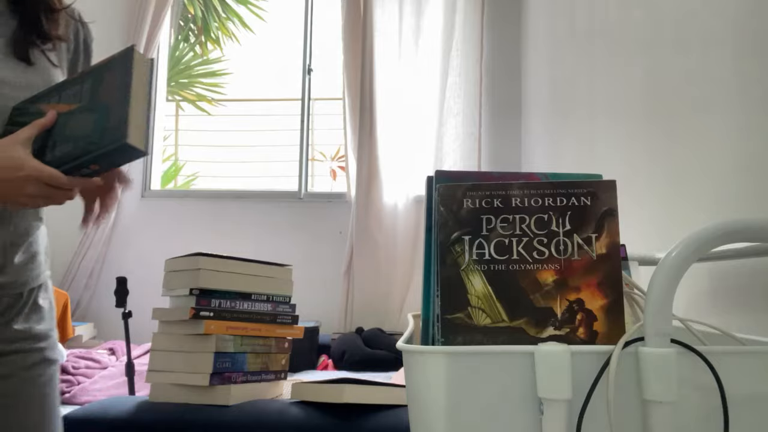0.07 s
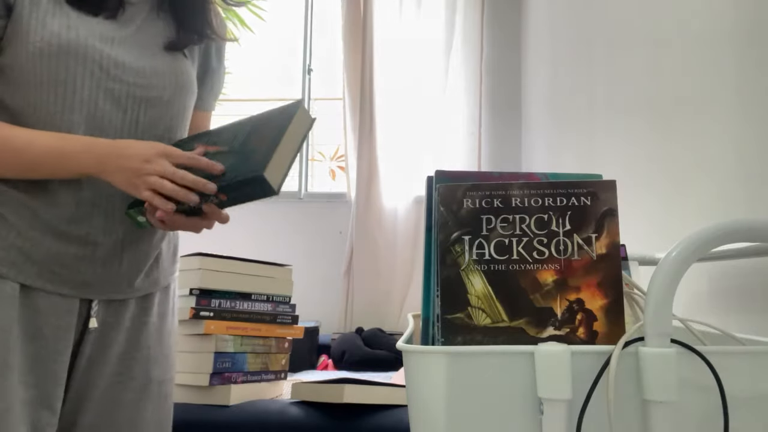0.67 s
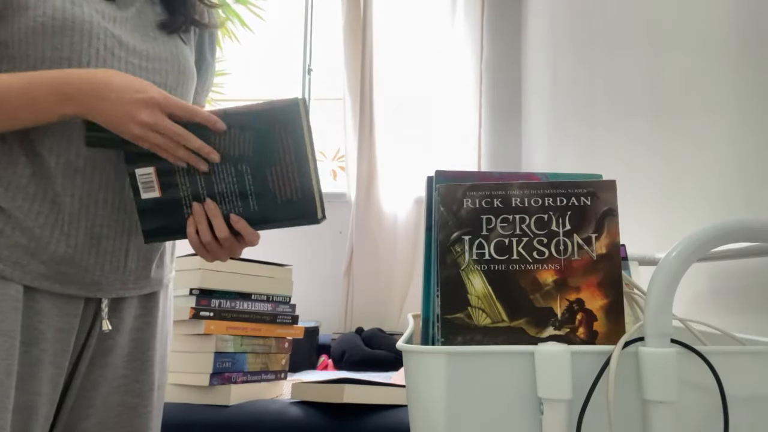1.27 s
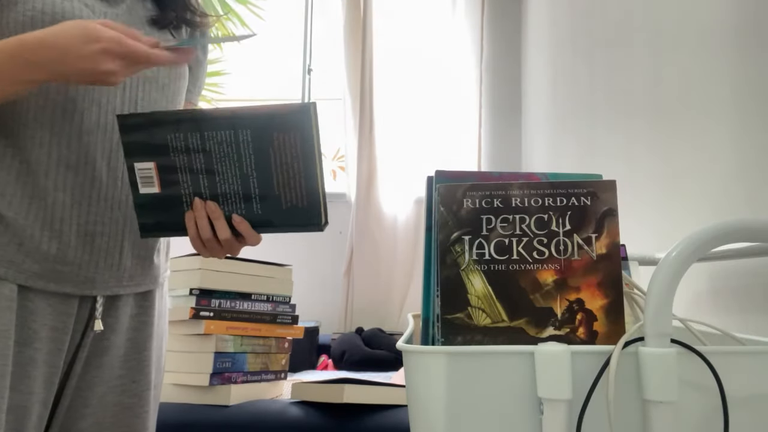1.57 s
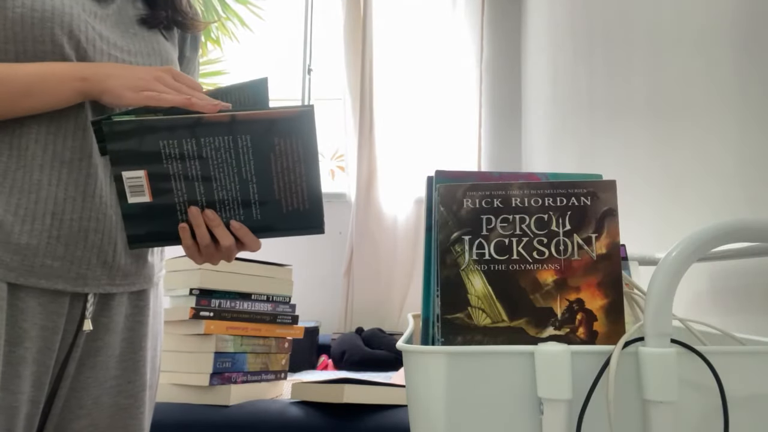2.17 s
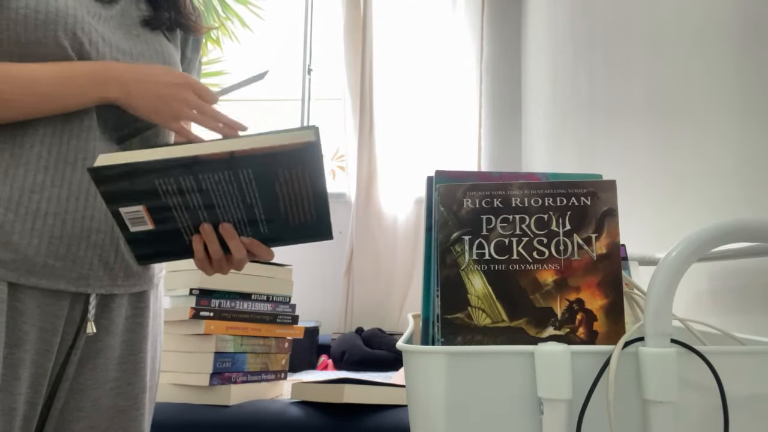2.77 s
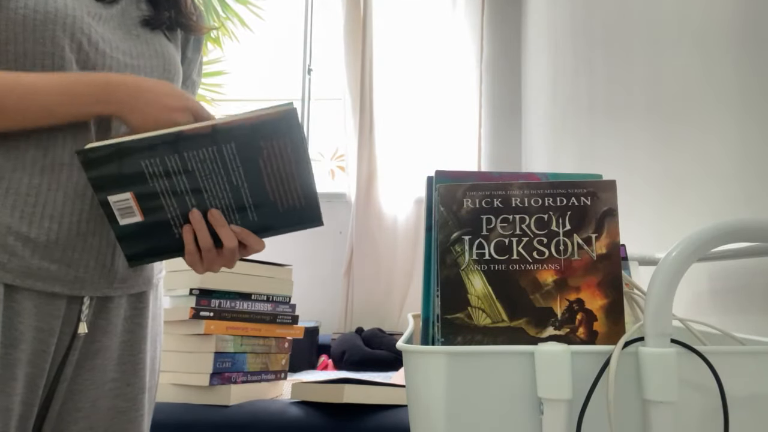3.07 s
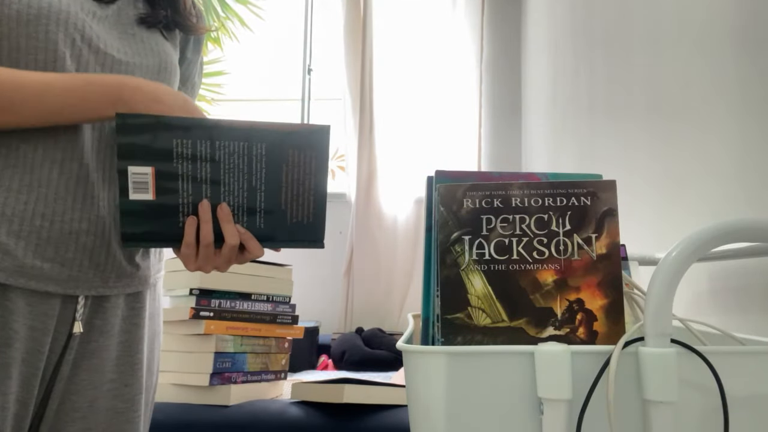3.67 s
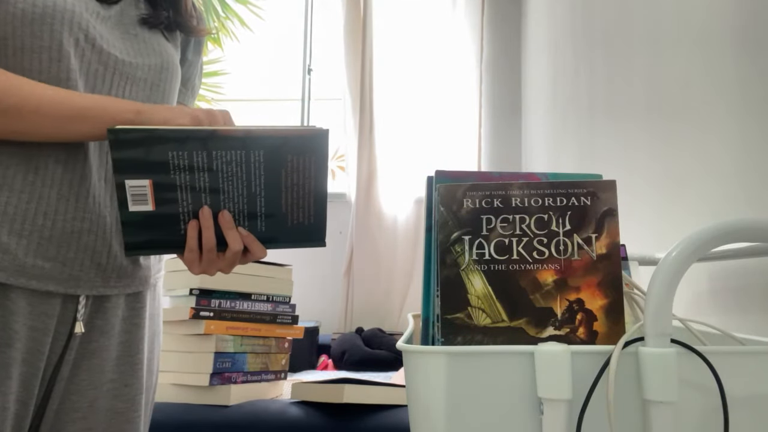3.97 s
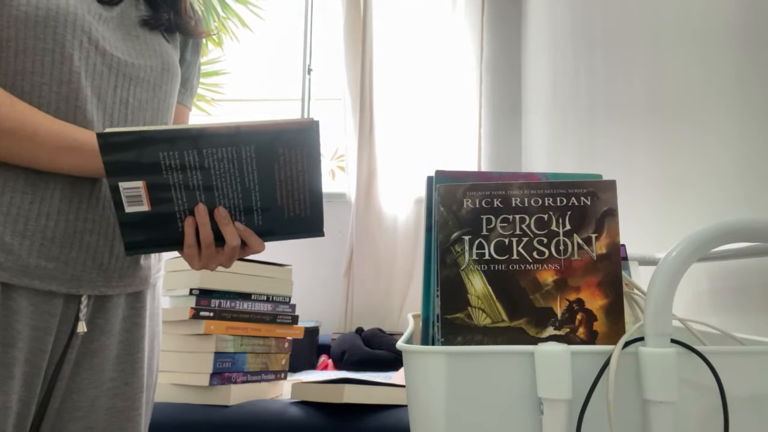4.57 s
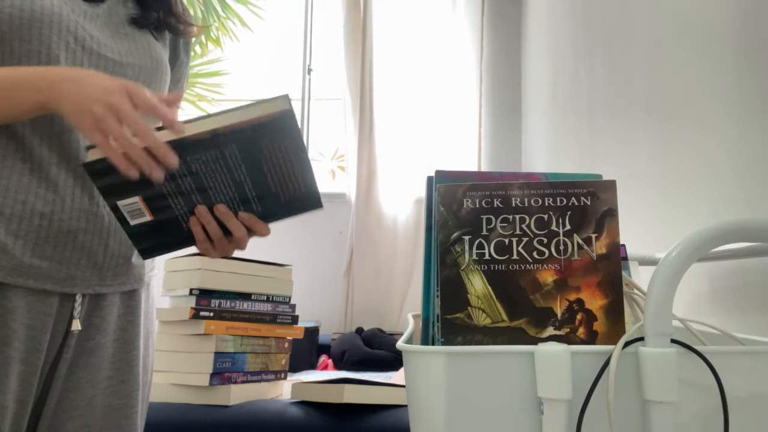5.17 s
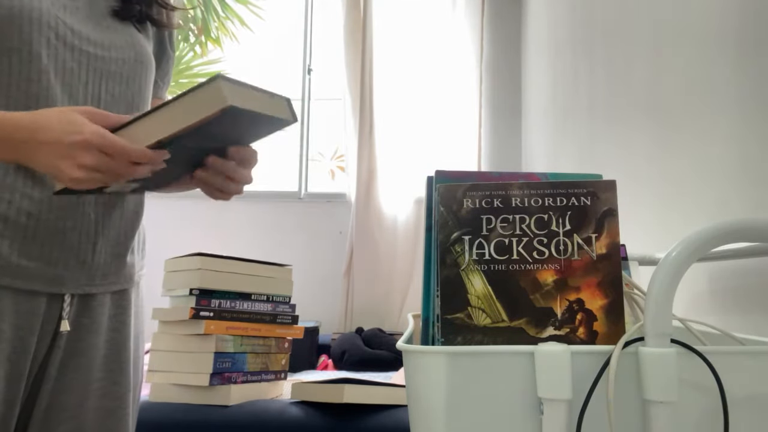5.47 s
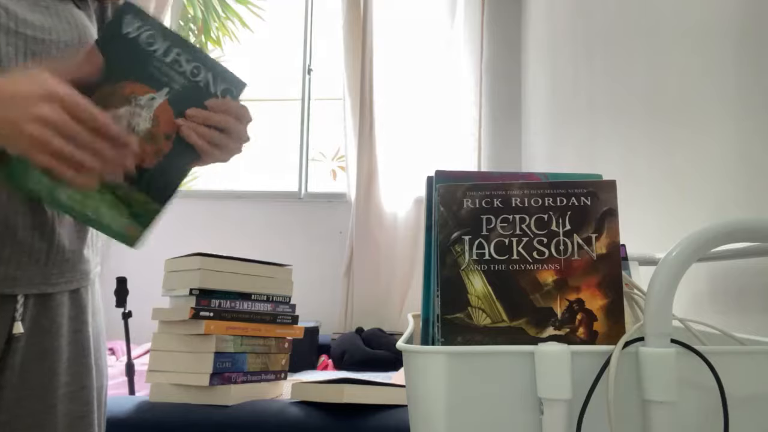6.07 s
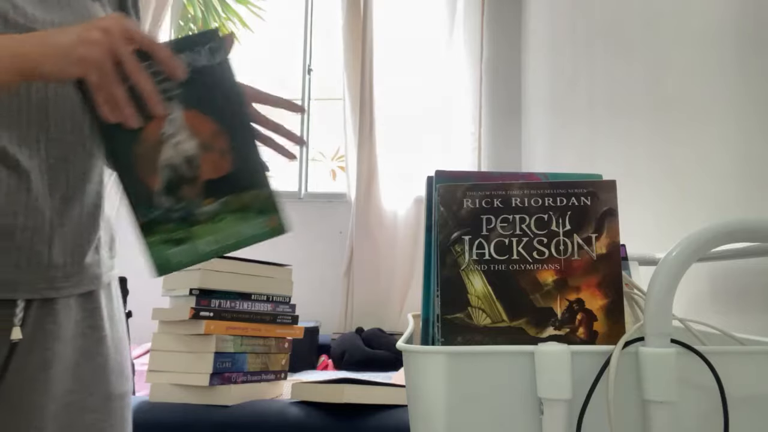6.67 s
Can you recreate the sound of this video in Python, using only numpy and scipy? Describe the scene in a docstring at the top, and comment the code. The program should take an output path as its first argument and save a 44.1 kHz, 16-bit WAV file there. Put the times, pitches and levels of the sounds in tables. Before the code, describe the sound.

Close stereo microphones pick up hands handling a hardcover book over the low hum of a small room. Palms thump and rub it, and the cover claps loudly once. After a brief finger judder come several knocks, then soft swishes and faint squeaks on the glossy jacket. Crisp page ticks and one more firm thump give way to gentle brushing and taps.

```python
"""A hardcover book is turned over in the hands in a small, quiet room with a low hum.
Palms rub the board and thump the block of pages; the cover claps, loudest at 1.7 s. A finger judders
across the board, then a run of knocks follows. Around 4 s fingertips swish and squeak on the glossy
jacket. Page edges tick, one more firm thump lands at 5.3 s, and the handling ends in light brushes
and taps. Two closely spaced microphones stand nearby."""
import sys
import numpy as np
from scipy import signal
from scipy.fft import rfft, irfft, next_fast_len
from scipy.io import wavfile
from scipy.ndimage import uniform_filter1d, map_coordinates

SR = 44100
rng = np.random.default_rng(int(sys.argv[2]) if len(sys.argv) > 2 else 0)


def wav_out(sig):
    """Save sig, one row per channel (or a flat mono array), as 16-bit PCM at SR to the path in sys.argv[1]."""
    wavfile.write(sys.argv[1], SR, np.round(np.clip(np.atleast_2d(sig).T, -1, 1) * 32767).astype(np.int16))


N = 300497


def amp(db):
    """Decibels to gain."""
    return 10 ** (np.asarray(db) / 20)


def unit(x):
    """Scale to rms 1."""
    return x / np.sqrt(np.mean(x ** 2) + 1e-20)


def along(points, hz):
    """Read (Hz, value) points on a log frequency axis."""
    freqs, values = np.transpose(points)
    return np.interp(np.log(hz + 1), np.log(freqs + 1), values)


def curves(rows):
    """One value per sample for each column after the time."""
    times, *columns = np.transpose(rows)
    return [np.interp(np.arange(N) / SR, times, column) for column in columns]


def wobble(rate):
    """A smooth random curve with rate knots a second."""
    knots = rng.standard_normal(int(N * rate / SR) + 4)
    return map_coordinates(knots, [np.arange(N) * rate / SR], order=3)


def filtered(x, response):
    """Pass x through a complex response, given as a function of Hz."""
    n = x.shape[-1]
    padded = next_fast_len(n + 8192)
    return irfft(rfft(x, padded) * response(np.fft.rfftfreq(padded, 1 / SR)), padded)[..., :n]


def coloured(x, spectrum):
    """Shape x with an EQ curve of (Hz, dB) points, at rms 1."""
    return unit(filtered(x, lambda hz: amp(along(spectrum, hz))))


def resonance(hz, centre, width):
    """Causal response of one mode."""
    return 1j * hz * width / (centre ** 2 - hz ** 2 + 1j * hz * width)


def add(track, start, sound):
    """Mix a sound into the track at start seconds."""
    part = track[..., max(round(start * SR), 0):][..., :sound.shape[-1]]
    part += sound[..., :part.shape[-1]]


# Stereo width of the room. Each row: frequency in Hz, left-right correlation.
CORRELATION = [(60, 0.82), (130, 1), (290, 0.47), (640, 0.033), (1500, 0.017), (15000, .02)]

def diffuse(size):
    """Stereo noise from all sides: alike in the bass, unrelated in the treble."""
    def mid_side(hz):
        angle = np.arccos(np.clip(along(CORRELATION, hz), -1, 1)) / 2
        return np.array([np.cos(angle), np.sin(angle)])
    mid, side = filtered(rng.standard_normal((2, size)), mid_side)
    return np.array([mid + side, mid - side])


# Phase between the microphones. Each row: frequency in Hz, lead of the left one in radians.
LEFT_LEAD = [(0, 0), (340, 0), (800, .9), (4100, 1.5), (8000, 6.3), (11500, 11), (13000, 13.6),
             (16000, 14.6)]
# Reverb time of the walls. Each row: frequency in Hz, seconds to fall 60 dB.
WALL_DECAY = [(100, 0.65), (260, 0.55), (700, 0.41), (2000, 0.31), (5000, 0.3), (14000, 0.21)]

def in_room(x, wet_db, right_db):
    """Direct sound arrives first on the left, its mids lean right; the walls answer just after."""
    sides = np.array([[.5], [-.5]])
    lean_db = lambda hz: right_db * along([(50, -0.36), (250, 1.0), (4500, 1), (7000, 0.28)], hz)
    direct = filtered(x, lambda hz: np.exp(1j * along(LEFT_LEAD, hz) * sides) * amp(-lean_db(hz) * sides))
    bands, t, noise = signal.stft(diffuse(size=SR // 2), SR, nperseg=256)
    decay = amp(-60 * t / along(WALL_DECAY, bands)[:, None])
    onset = 1 - np.exp(-t / 0.00063)
    _, tail = signal.istft(noise * decay * onset, SR, nperseg=256)
    curtains = lambda hz: amp(along([(4000, 0.73), (13000, 0.025)], hz))  # soak up a little treble
    tail = filtered(tail / np.linalg.norm(tail[0]), curtains)
    return direct + amp(wet_db) * signal.fftconvolve(x[None], tail, axes=1)[:, :len(x)]


# Fader ride of the hum. Each row: time in seconds, relative level in dB.
HUM_RIDE = [(0.0, -45), (0.04, -51.5), (1.15, -56.5), (1.4, -68), (1.48, -53.5), (1.78, -51), (1.84, -66),
            (1.95, -47), (2.31, -59), (2.45, -51), (3.32, -59), (3.68, -73), (5.01, -66.5), (5.37, -49),
            (5.44, -55.5), (6.81, -56.5)]
# EQ of the still air. Each row: frequency in Hz, gain in dB.
AIR_EQ = [(20, -11.5), (45, -2.5), (75, 4.5), (120, -12.5), (250, -6.5), (500, -12.5), (1000, -15),
          (2500, -20), (6000, -26), (13000, -24), (16000, -46.5)]

def room_tone():
    """A low hum swells and sinks over a bed of still air."""
    ride_db, = curves(HUM_RIDE)
    pitch_hz = 59.2 + 0.44 * wobble(5.4)
    hum = np.sqrt(2) * np.sin(2 * np.pi * np.cumsum(pitch_hz) / SR)
    hum *= amp(ride_db + 1.0 + 2.2 * wobble(12))
    air = amp(-71.5) * coloured(diffuse(size=N), AIR_EQ)
    return hum * amp([[.3], [-.3]]) + air


# Fader ride of the movement. Each row: time in seconds, relative level in dB.
HEAVE_RIDE = [(0.0, -54.5), (0.36, -57.5), (1.33, -59.5), (1.97, -49.5), (2.22, -61.5), (2.67, -59),
              (3.0, -64.5), (4.76, -79), (5.2, -70), (5.33, -68), (6.64, -59.5), (6.81, -60.5)]
# EQ of its rumble. Each row: frequency in Hz, gain in dB.
RUMBLE_EQ = [(25, -26.5), (55, -21), (68, 5), (78, 8), (92, 2), (125, -6), (160, -0.5), (230, -8),
             (320, -16.5), (500, -21.5), (1000, -47.5)]

def heave():
    """The moving book and arms make a dull rumble."""
    ride_db, = curves(HEAVE_RIDE)
    rumble = coloured(rng.standard_normal(N), RUMBLE_EQ)
    return in_room(amp(ride_db - 1.5) * rumble, wet_db=-1, right_db=9)


def stroke(start, length, peak):
    """Friction swells and fades with the hand's speed, which tops out at the share peak of the stroke."""
    progress = (np.arange(N) / SR - start) / length
    during = (progress > 0) & (progress < 1)
    ramp = np.interp(progress[during], [0, peak, 1], [0, 1, 0])
    gain = np.zeros(N)
    gain[during] = np.sin(np.pi / 2 * ramp) ** 1.41
    return gain


def friction(spectrum, catches_per_s, grain_db, uneven_db):
    """Countless tiny slips and a few larger catches under uneven pressure, mirrored by the moving cover."""
    catches = (rng.random(N) < catches_per_s / SR) * rng.standard_normal(N)
    slips = coloured(rng.standard_normal(N) + amp(grain_db) * unit(catches), spectrum)
    delay_s = 0.001186 * 2 ** (.5 * wobble(1.8))
    mirrored = np.interp(np.arange(N) - delay_s * SR, np.arange(N), slips)
    pressure = amp(uneven_db * wobble(70))
    return unit((slips + .5 * mirrored) * pressure)


# EQs of the board's rasp, the jacket's swish and the paper's hiss. Each row: frequency in Hz, gain in dB.
RASP_EQ = [(150, -19.5), (320, -2.5), (450, -2), (620, -1), (900, 1), (1400, -1.5), (2000, -6.5),
           (3000, -16.5), (6000, -54)]
SWISH_EQ = [(1000, -19), (2000, -3.5), (3000, 2), (4200, 0.5), (5500, -3), (8000, -10), (9500, -16.5),
            (13000, -39.5), (16000, -49)]
HISS_EQ = [(3000, -25), (5500, -10), (8000, -2), (9500, -3), (11500, 1), (13000, 3), (14500, 0),
           (15800, -16)]
# A palm rubbing the board. Each row: start in seconds, length in seconds, rasp send in dB,
# hiss send in dB against the rasp send.
PALM_RUBS = [(0.136, 0.2, -52, -12.5), (0.487, 0.11, -57.5, -14.5), (0.637, .2, -52, -12.5),
             (1.698, 0.24, -43, -24), (2.115, 0.11, -63.5, -24), (2.326, 0.16, -65, -58),
             (2.608, 0.22, -48.5, -16.5), (2.837, 0.22, -55, -27), (2.961, 0.17, -47.5, -9.5),
             (3.107, .1, -44, -47), (3.301, .15, -43.5, -17.5), (3.695, .16, -50, -26),
             (6.14, 0.35, -74, -8), (6.496, 0.21, -58, -23)]
# Light brushes along the paper. Each row: start in seconds, length in seconds, hiss send in dB.
PAPER_BRUSHES = [(0.245, 0.2, -64), (0.823, 0.29, -57), (1.141, 0.25, -57), (1.572, .12, -67.5),
                 (3.168, 0.15, -55), (3.833, 0.21, -60.5), (4.676, 0.32, -65), (4.836, 0.15, -59),
                 (5.263, .07, -68.5), (5.338, 0.22, -74), (5.808, 0.25, -67.5), (6.297, 0.11, -69),
                 (6.409, 0.18, -69.5)]
# Fingertips swiping the jacket. Each row: start in seconds, length in seconds, swish send in dB.
JACKET_SWIPES = [(1.05, 0.091, -61.5), (1.114, .16, -51.5), (1.336, 0.12, -56.5), (1.675, .05, -51),
                 (2.682, 0.049, -66), (3.754, 0.065, -66.5), (3.969, 0.098, -56), (4.059, .11, -56),
                 (4.252, 0.043, -66.5), (4.389, 0.09, -67.5), (4.509, 0.12, -61.5)]

def slides():
    """Hands rasp on the board, hiss along the paper and swish over the jacket; each touch blends all three."""
    touches = []  # an envelope and its sends to rasp, swish and hiss
    for start, length, db, hiss_db in PALM_RUBS:
        touches.append((stroke(start, length, peak=0.32), [db, db + hiss_db / 2, db + hiss_db]))
    for start, length, db in PAPER_BRUSHES:
        touches.append((stroke(start, length, peak=0.73), [db - 12.5, db - 11, db]))
    for start, length, db in JACKET_SWIPES:
        touches.append((stroke(start, length, peak=0.54), [db - 11.5, db, db - 1.5]))
    sends = sum(amp(sends_db)[:, None] * envelope for envelope, sends_db in touches)
    rasp, swish, hiss = uniform_filter1d(sends, size=SR // 60, axis=1)  # a hand never starts at once
    rasp *= amp(-6.0) * friction(RASP_EQ, catches_per_s=300, grain_db=-4, uneven_db=3.14)
    swish *= amp(-3.88) * friction(SWISH_EQ, catches_per_s=120, grain_db=-4.5, uneven_db=3.4)
    hiss *= friction(HISS_EQ, catches_per_s=220, grain_db=-3, uneven_db=1.2)
    return in_room(hiss, wet_db=-7, right_db=3) + in_room(rasp + swish, wet_db=-3, right_db=8)


# Modes of the cover board. Each row: frequency in Hz, width in Hz, gain in dB.
BOARD_MODES = [(514, 48, -1), (806, 170, 1), (970, 55, 3.5), (1123, 180, -3.5), (1423, 190, -2),
               (1850, 680, -6.5), (3310, 710, -2.5), (3900, 2700, -7.5), (8300, 3800, -8),
               (12900, 5800, -8.5)]
# Sharp hits of cover, jacket and fingertips. Each row: start in seconds, level in dB, top edge in Hz.
COVER_CLAPS = [(.176, -44.5, 900), (0.3323, -52, 1970), (1.0503, -34, 4700), (1.152, -38, 6360),
               (1.4494, -43, 6740), (1.72, -20, 7600), (1.7235, -31, 490), (1.7276, -30.5, 7500),
               (1.7458, -28, 3400), (2.1289, -49.5, 5650), (2.641, -44, 3030), (2.7065, -35, 3000),
               (2.79, -38.5, 3000), (2.8827, -38, 1530), (2.9727, -41.5, 4370), (3.1056, -28, 2530),
               (3.144, -38, 1980), (3.1547, -25.5, 1240), (3.2915, -23, 1050), (3.291, -29, 7740),
               (3.975, -46, 8700), (5.2771, -46.5, 1860), (5.7355, -62, 1270), (5.985, -51.5, 3500),
               (6.178, -61, 1820), (6.5257, -56, 6540)]

def claps():
    """A first contact and a short crush excite the board; harder hits are brighter and over sooner."""
    track, t = np.zeros((2, N)), np.arange(SR // 2) / SR
    board = lambda f: sum((-1) ** k * amp(db) * resonance(f, hz, width)
                          for k, (hz, width, db) in enumerate(BOARD_MODES))
    edge = lambda f, hz: resonance(f, hz, np.sqrt(2) * hz)
    for start, db, top_hz in COVER_CLAPS:
        hardness = top_hz / 2550  # 1 is a middling hit
        bottom_hz = 830 * hardness ** 0.35
        crush_s = 0.013 / hardness ** 0.35
        force = rng.standard_normal(len(t)) * amp(-40 * t / crush_s)
        force[0] = amp(14.0)  # the first contact
        clap = filtered(force, lambda f: board(f) * edge(f, bottom_hz) * edge(f, top_hz))
        add(track, start, in_room(amp(db) * clap / np.abs(clap).max(), wet_db=-0.5, right_db=7))
    return track


# Soft blows on the closed book. Each row: start in seconds, level in dB, pitch in Hz.
PALM_THUMPS = [(.178, -20.5, 261.2), (.248, -30.5, 242.7), (0.776, -51.5, 214), (1.054, -34, 302),
               (1.147, -45, 241), (1.473, -44, 189), (1.724, -33, 411), (1.744, -32.5, 241.7),
               (2.642, -47.5, 137), (3.156, -43, 290), (3.293, -41, 320), (5.282, -28.5, 214.5),
               (5.741, -53.5, 254), (5.99, -48.5, 277), (6.19, -46.5, 286)]
# Modes of the block of pages. Each row: multiple of the thump's pitch, gain in dB.
BLOCK_MODES = [(.62, -11), (.9, -7), (1, 0), (1.15, -11), (2.05, -29), (3.05, -30)]
# Standing waves between the walls. Each row: frequency in Hz, width in Hz, relative gain in dB.
ROOM_MODES = [(153, 15.3, -1), (232.6, 8.5, 1.5), (286.4, 5.4, -4)]

def thumps():
    """A palm sets the heavy block of pages ringing, low and briefly; the room's standing waves boom on."""
    track, t = np.zeros(N), np.arange(SR * 3 // 4) / SR
    attack = 1 - np.exp(-t / 0.0071)
    for start, db, hz in PALM_THUMPS:
        t60 = 32.3 / hz  # the block falls 60 dB in 32.3 swings
        ring = sum(amp(mode_db + rng.normal(0, 1)) * np.sin(2 * np.pi * ratio * hz * t)
                   for ratio, mode_db in BLOCK_MODES)
        add(track, start, amp(db - 60 * t / t60) * attack * ring)
    room = lambda f: sum(amp(db) * resonance(f, hz, width) for hz, width, db in ROOM_MODES)
    boom = amp(0.5) * filtered(track, room)
    return in_room(track + boom, wet_db=-7, right_db=5.5)


# Page edges flicking past a fingertip. Each row: start in seconds, level in dB.
PAGE_TICKS = [(1.05, -34), (1.4486, -31), (3.263, -32.5), (3.2723, -27), (4.9247, -38), (4.9324, -24),
              (4.9404, -38), (5.1577, -44), (5.277, -49), (5.9835, -38)]

def ticks():
    """Each page edge lets go with one tiny, bright snap."""
    track = np.zeros(N)
    snap = filtered(signal.unit_impulse(200), lambda hz: resonance(hz, centre=12500, width=6000) ** 2)
    for start, db in PAGE_TICKS:
        add(track, start, amp(db) * snap / np.abs(snap).max())
    return in_room(track, wet_db=-9, right_db=0)


# Faint squeaks on the jacket. Each row: start in seconds, length in seconds, pitch in Hz,
# glide in octaves, level in dB.
SKIN_SQUEAKS = [(1.326, 0.1, 3150, .1, -66), (3.485, 0.15, 4560, 0.16, -68.5),
                (3.965, 0.085, 2830, 0.018, -57.5), (4.237, 0.058, 3024, 0.045, -68),
                (4.509, 0.1, 2607, 0.0022, -65.5), (6.049, 0.14, 3300, -.4, -80),
                (6.45, 0.16, 4700, -0.12, -68)]

def squeaks():
    """Skin catching on the gloss sings in a narrow, unsteady band."""
    track = np.zeros(N)
    for start, length, hz, glide, db in SKIN_SQUEAKS:
        progress = np.linspace(0, 1, int(length * SR))
        jitter = unit(uniform_filter1d(rng.standard_normal(len(progress)), size=30))
        pitch_hz = hz * 2 ** (glide * (progress - .5)) * (1 + 0.0665 * jitter)
        tone = np.sin(2 * np.pi * np.cumsum(pitch_hz) / SR)
        add(track, start, amp(db) * np.sin(np.pi * progress) * tone)
    return in_room(track, wet_db=-2, right_db=7)


# A finger sticking and slipping. Each row: time in seconds, slips per second, level in dB.
FINGER_JUDDER = [(2.34, 77, -79), (2.385, 100, -46), (2.41, 94, -36), (2.455, 117, -40.5),
                 (2.49, 90.3, -44), (2.555, 106, -46), (2.61, 61, -61)]

def judder():
    """Slow stick and slip shakes the whole board; each slip also scrapes a little."""
    slip_rate, db = curves(FINGER_JUDDER)
    phase = 2 * np.pi * np.cumsum(slip_rate * (1 + 0.098 * wobble(60))) / SR
    scrape_eq = [(100, 0), (300, 6.5), (600, -4.5), (1100, -9), (2500, -62), (6000, -64)]
    scrape = amp(-17.5) * coloured(rng.standard_normal(N), scrape_eq)
    shake = np.sqrt(2) * np.sin(phase) + scrape * (1 + 0.51 * np.cos(phase))
    t = np.arange(N) / SR
    gate = (t > FINGER_JUDDER[0][0]) & (t < FINGER_JUDDER[-1][0])
    return in_room(amp(db) * shake * gate, wet_db=-14, right_db=3)


def scene():
    """The humming room and all the handling in it."""
    return room_tone() + heave() + slides() + claps() + thumps() + ticks() + squeaks() + judder()


def record(dry):
    """The microphones have a low cut, a narrow notch in the treble and a band limit."""
    low_cut_hz, top_hz = 38, 15800
    cut = signal.sosfilt(signal.butter(3, low_cut_hz, "high", fs=SR, output="sos"), dry)
    treble_eq = [(9300, -0.5), (9900, -4.0), (10250, -19), (10750, -20.0), (11150, -6.5),
                 (11900, -5.0), (14800, -4.5), (15800, -22)]
    return filtered(cut, lambda hz: amp(along(treble_eq, hz)) * (hz < top_hz))


dry = scene()
out = record(dry)
wav_out(out)
```